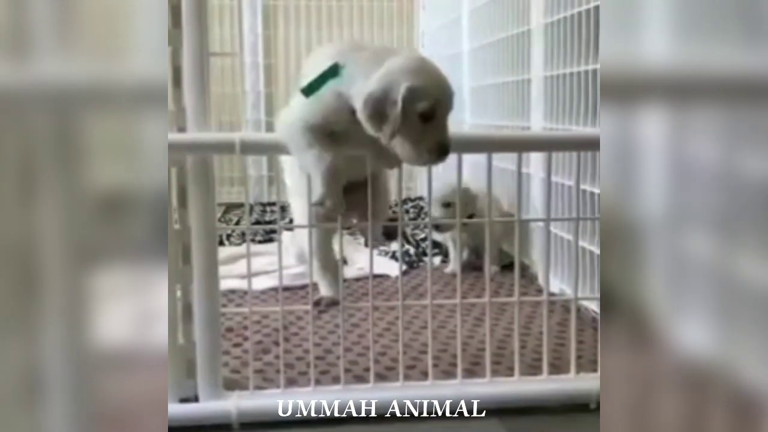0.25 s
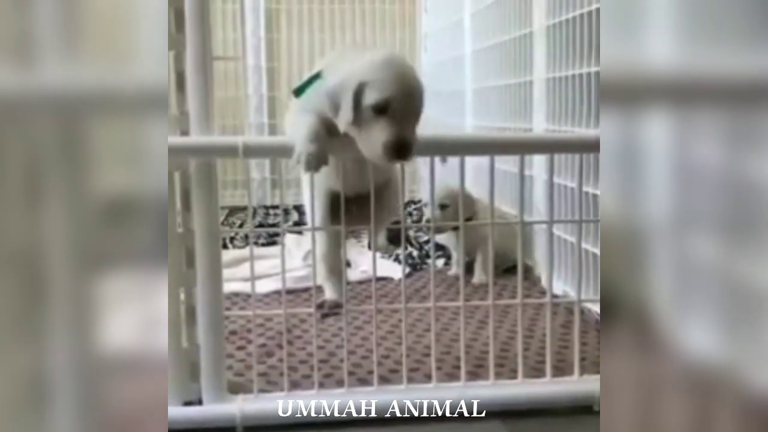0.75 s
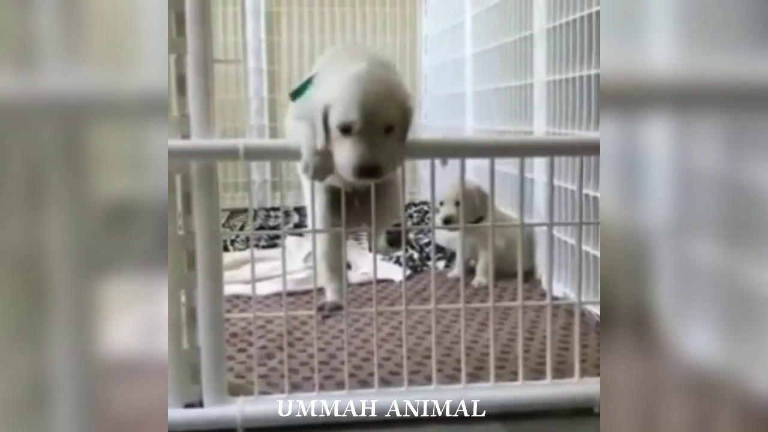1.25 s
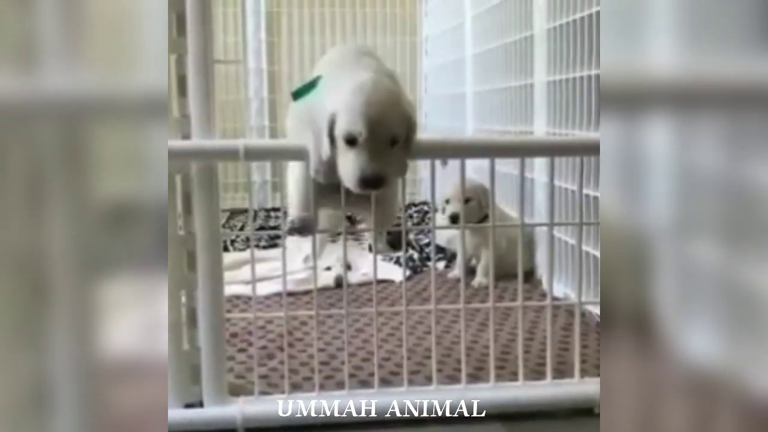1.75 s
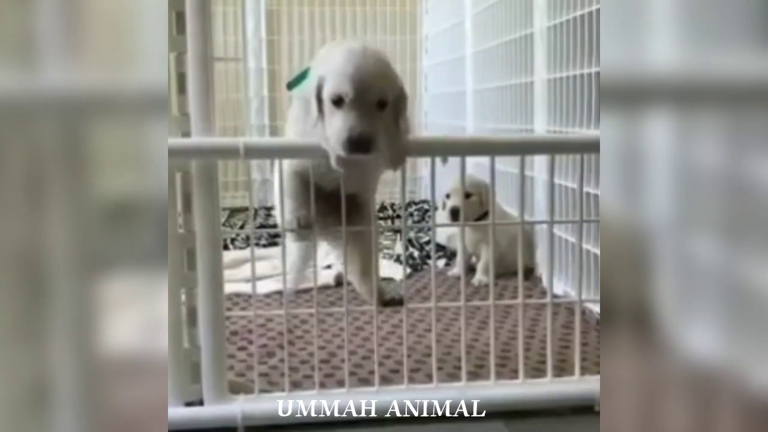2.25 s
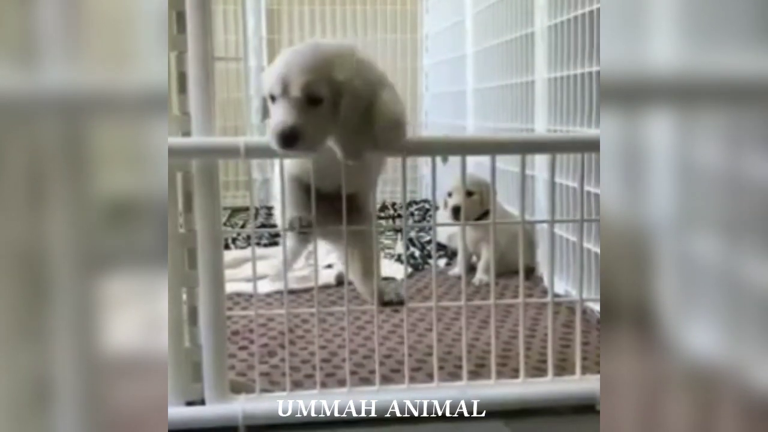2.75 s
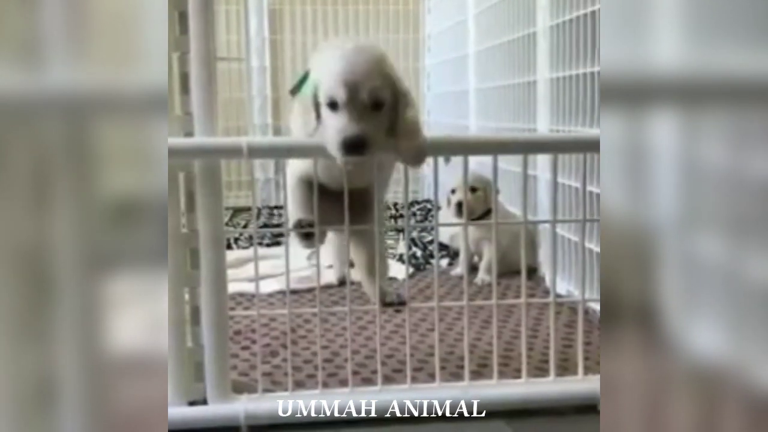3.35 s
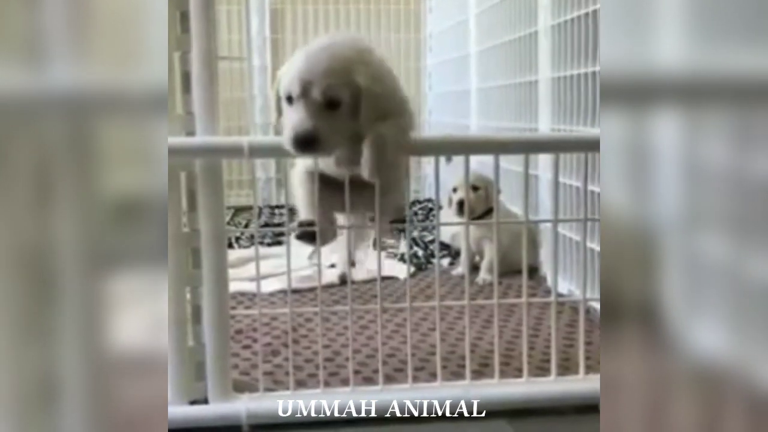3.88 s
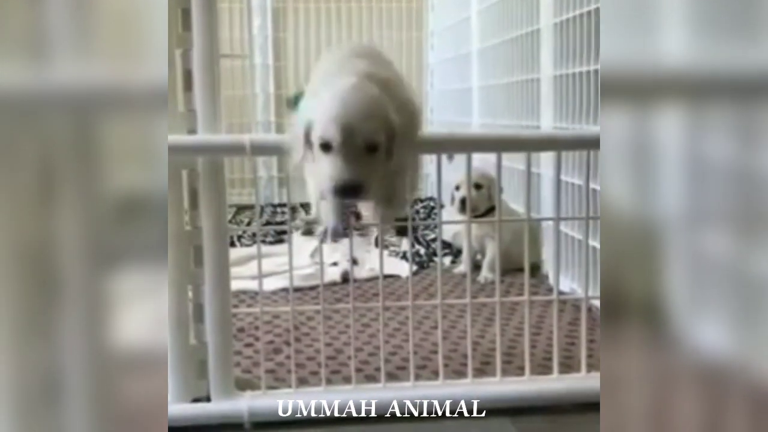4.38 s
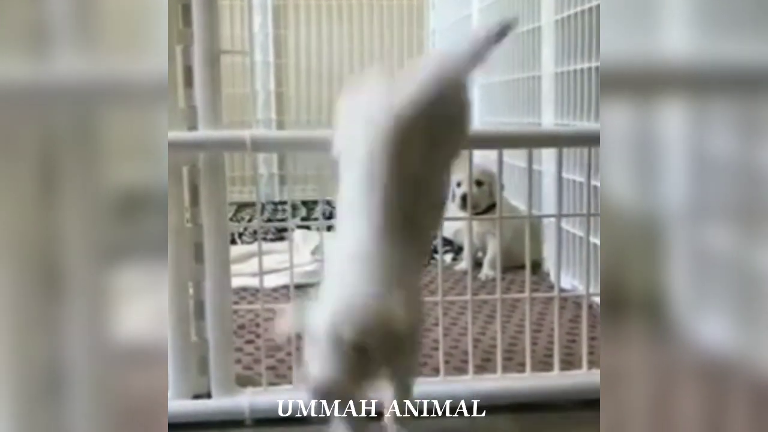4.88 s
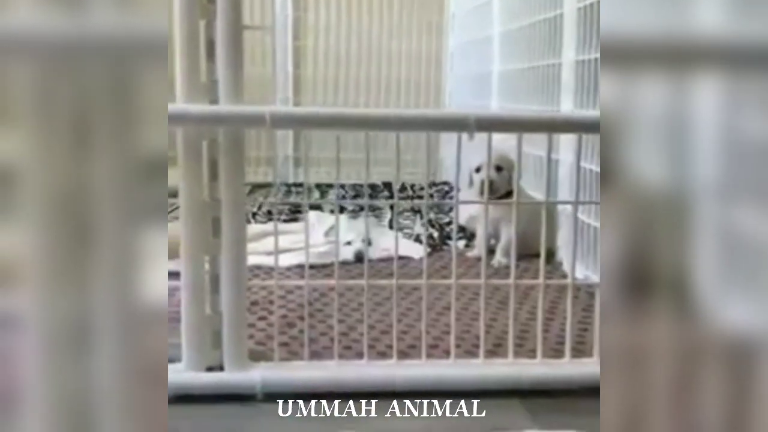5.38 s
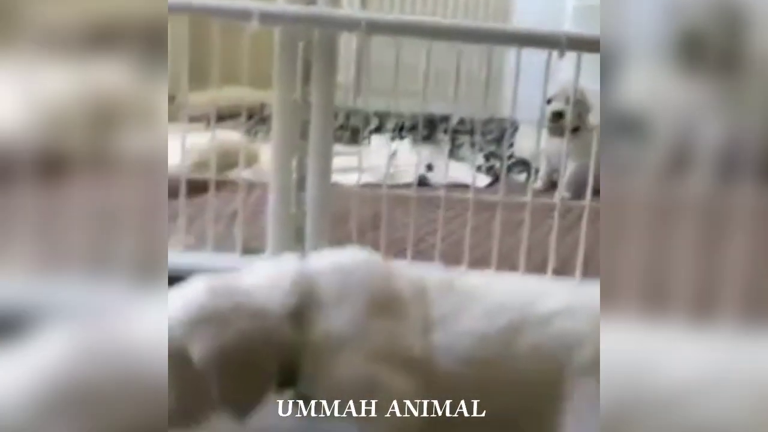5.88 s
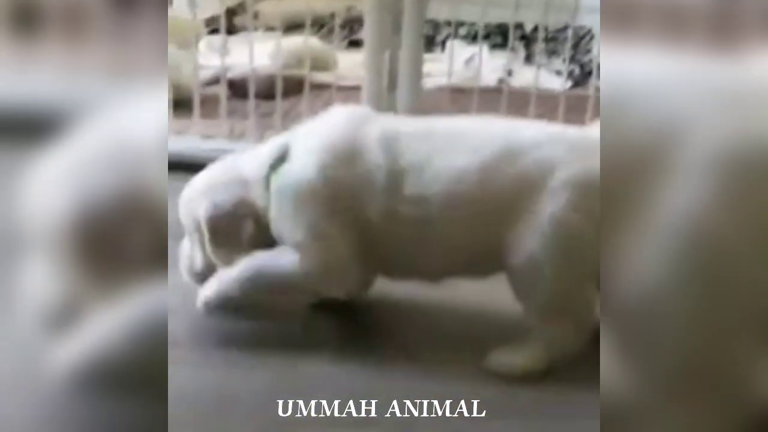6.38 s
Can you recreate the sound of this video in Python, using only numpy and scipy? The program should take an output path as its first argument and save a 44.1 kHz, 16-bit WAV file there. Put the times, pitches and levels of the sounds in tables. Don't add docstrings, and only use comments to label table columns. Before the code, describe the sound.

Faint hum and soft hiss lie under a young puppy's high squeaky whimpers, each a fraction of a second and falling at the end, heard a step from a phone-like microphone with dull treble limits. Light claw ticks on bars join in. Then paws hit the floor, nails skitter, a hollow panel is knocked hard, the pen rumbles away, and quiet nose puffs and sparse ticks finish the scene indoors.

```python
import sys
import numpy as np
from scipy import signal
from scipy.fft import rfft, irfft
from scipy.io import wavfile
from scipy.ndimage import uniform_filter1d

SR = 44100
rng = np.random.default_rng(int(sys.argv[2]) if len(sys.argv) > 2 else 0)


def inscribe(sig):
    pcm = np.round(np.clip(np.atleast_2d(sig).T, -1, 1) * 32767)
    wavfile.write(sys.argv[1], SR, pcm.astype(np.int16))


def ratio_of_db(decibels):
    return 10 ** (np.asarray(decibels, float) / 20)


N = 292383
T = np.arange(N) / SR

# (pitch [Hz], level [dB])
HUM = [(48.4, -60), (96.9, -88.5), (118.4, -70), (209.9, -77.5)]
# (frequency [Hz], level per Hz [dB])
HISS = [(12, -35), (20, -10), (130, -8), (172, -13.5), (974, -27.5), (1360, -24), (1790, -29.5),
        (3100, -36.5), (3660, -35.5), (4560, -39.5), (7910, -40.5), (11600, -39.5), (14500, -43)]

# (time [s], peak [dB], tilt [dB per octave], low knock [dB])
BAR_TICKS = [(0.0624, -73, -8.5, -57), (0.187, -54, -11, -57), (1.8951, -44.5, -1.5, -72),
             (1.936, -43, -2, -75), (2.0433, -48, -3, -75), (2.1027, -48, -9, -50.5),
             (2.2563, -32.5, -4, -56), (3.1312, -43, 1, -71), (3.2014, -35.5, 1.5, -71),
             (3.8484, -42.5, -0.5, -81), (3.924, -31.5, -0.5, -56), (4.045, -40, 0.5, -72),
             (4.1291, -63, -6, -55), (4.177, -43, -1.5, -64), (4.2294, -37, 0.5, -74),
             (4.2374, -34, -15, -47), (4.8132, -43, -4.5, -61), (4.8342, -42, -7.5, -55)]
# (time [s], peak [dB], tilt [dB per octave], low knock [dB])
FLOOR_TICKS = [(5.213, -29, -3.0, -54.5), (5.2212, -62.5, -9, -63), (5.236, -33, -3.0, -39),
               (5.318, -42, -2.5, -55.5), (5.3991, -33, -3.5, -68.5), (5.4095, -32.5, -4.5, -57),
               (5.4197, -37, -1, -66), (5.4815, -29.5, -0.5, -48), (5.5386, -26.5, -8.5, -64.5),
               (5.639, -42, 5, -65), (6.0887, -41, -2, -60), (6.392, -47.5, -4, -55), (6.5354, -46, 0, -64),
               (6.542, -41, -0.5, -71), (6.599, -42.5, -1, -55.5)]

# (time [s], length [s], level [dB])
PUFFS = [(0.092, 0.06, -72.5), (0.348, 0.071, -69.5), (0.687, 0.2, -70.5), (1.166, 0.058, -62),
         (1.534, 0.067, -66.5), (1.846, 0.048, -62), (2.468, 0.058, -62), (2.792, 0.037, -67),
         (3.768, 0.038, -61), (4.299, 0.095, -63.5), (4.65, 0.045, -69), (5.914, 0.07, -49),
         (5.976, 0.025, -49), (6.249, 0.076, -50), (6.599, .024, -54), (4.176, 0.048, -62),
         (1.903, 0.061, -63), (5.308, 0.023, -53), (5.549, 0.045, -43.5), (3.972, 0.062, -62),
         (0.924, 0.021, -78), (2.257, 0.052, -61.5), (3.21, 0.049, -68)]
# (time [s], length [s], first pitch [Hz], last pitch [Hz], level [dB])
WHISTLES = [(.115, 0.028, 13700, 13600, -61), (0.366, 0.047, 14000, 13300, -63),
            (0.792, 0.039, 13900, 13200, -55), (0.806, 0.066, 13300, 13200, -62.5),
            (1.14, 0.048, 12600, 11100, -51.5), (1.487, 0.03, 12300, 11800, -57),
            (1.504, 0.05, 12430, 11500, -50), (1.819, 0.04, 12200, 11730, -49),
            (2.095, .05, 13000, 13400, -71), (2.133, 0.086, 12750, 12400, -48.5),
            (2.435, 0.063, 12700, 11200, -52), (2.754, 0.071, 11930, 12400, -69.5),
            (3.046, 0.079, 12100, 11500, -58), (3.318, 0.074, 12850, 13100, -56),
            (3.352, 0.065, 12300, 12000, -58.5), (3.446, 0.037, 12000, 11700, -51),
            (3.706, 0.068, 13260, 11600, -46)]
# (time [s], first pitch [Hz], level [dB])
UP_CHIRPS = [
    (1.059, 13200, -64.5),
    (2.063, 13200, -62),
    (4.564, 13200, -64),
    (5.097, 13150, -53.5),
]
# (time [s], first pitch [Hz], level [dB])
DOWN_CHIRPS = [(1.208, 13450, -62), (1.558, 13050, -52.5), (1.855, 13250, -59), (2.515, 13100, -62),
               (2.799, 13050, -58.5), (3.105, 13100, -61), (3.785, 12900, -51.5), (4.019, 13450, -60),
               (4.375, 13300, -58), (4.642, 13000, -52.5)]
# (multiple of the voice pitch, level [dB])
SIDEBANDS = [(-2, -16), (-1, -1), (1, -16)]

# (start [s], crest [s], end [s], level at the crest [dB], mouth opening [0-1])
WHINES = [(0.716, 0.750, 0.806, -40.5, 0), (0.806, 0.82, 0.885, -52.5, .1),
          (1.086, 1.139, 1.187, -29, 0.46), (1.449, 1.482, 1.540, -28.5, 0.28),
          (1.768, 1.819, 1.845, -30, 0.15), (2.086, 2.136, 2.212, -25.5, 0.44),
          (2.385, 2.422, 2.478, -28.5, 0.33), (2.718, 2.769, 2.801, -28.5, 0.2),
          (2.994, 3.043, 3.105, -26.5, 0.45), (3.652, 3.703, 3.758, -24, 0.26), (3.992, 4, 4.028, -45, 0.5),
          (4.252, 4.298, 4.320, -31.5, 0), (5.108, 5.146, 5.202, -47, .75)]
# (first pitch [Hz], crest pitch [Hz], last pitch [Hz], bend of the climb [power],
# bend of the fall [power]); a bend under 1 is sharp at the crest, over 1 round
TUNES = [(1150, 1225, 1090, 0.72, .2), (1195, 1185, 1160, 0.98, 1.1), (1429, 1408, 1015, 1.28, .8),
         (1347, 1444, 1170, 1.5, 1.106), (1400, 1490, 1210, 1.6, 2), (1444, 1512, 950, 1.4, 1.45),
         (1087, 1387, 1045, 0.97, 1.1), (1363, 1395, 997, 2.1, 1.4), (1353, 1508, 1036, 1.2, 1.4),
         (1058, 1426, 1060, 1.7, 1.52), (1045, 1008, 863, 0.92, 0.62), (966, 1220, 985, 0.368, 0.31),
         (810, 861, 830, 1.9, .45)]
# (swell up to the crest [dB], slump after it [dB], breath against the voice [dB])
EFFORTS = [(13.5, 20, -24), (5, 10, -36), (3.5, 26.5, -30.5), (1.5, 16.5, -29.5), (0, 0, -29.5),
           (4, 18.5, -29.5), (6, 12, -28.5), (3, 17, -30), (3.5, 19, -27.5), (10, 18, -28.5), (3, 17, -27),
           (8, 12, -22.5), (3, 19, -17)]
# (time [s], pitch [Hz], level [dB])
SHAPED = [
    [(3.288, 1490, -48), (3.298, 1485, -27.5), (3.315, 1500, -28.5), (3.338, 1557, -27.5),
     (3.375, 1544, -28.5), (3.41, 1409, -27), (3.45, 1305, -29), (3.468, 1100, -36), (3.487, 963, -71)],
    [(4.57, 950, -58), (4.577, 950, -40), (4.59, 1016, -35.5), (4.606, 1150, -32.5), (4.622, 1257, -32.5),
     (4.628, 1268, -35), (4.633, 1135, -38), (4.641, 1130, -45), (4.648, 1100, -70)],
]
# (mouth opening [0-1], breath against the voice [dB])
SHAPED_MOUTH_BREATH = [
    (0.48, -32),
    (.15, -25),
]
# (lift of partial 2 [dB], of 3 [dB], of 4 [dB],
# of 5 and up [dB], loss of the upper ones as the pitch sags [dB])
COLOURS = [(3.5, 5, -1.5, 3, 0.5), (-1, -1.5, -3.5, 0, 1), (-0.5, 0.5, -4.5, 1.5, 6), (0.5, 2, -6, -4, 0),
           (-1.5, -1.5, 1.5, 4, 3), (3, 1.5, -7, -8.5, 6), (0, 1, -7, -1, 2.5), (-5, -4.5, 7, 3, 6),
           (-6, 0, 1.5, -2, 7), (1, -1, 1, 6, 5), (3, 1, -1, -4, 0), (-0.5, 0, -5, 2, 0),
           (3, 3, 7, 7.5, 10), (1, 4, -4, 3, 0), (-1, 7, 1, 8, 3)]
# (frequency [Hz], level [dB])
THROAT = [(900, 3), (1600, -2), (1900, -14), (2500, -31.5), (3100, -40.5), (3700, -32), (4400, -19.5),
          (5000, -28), (5800, -29), (6500, -28), (7400, -33), (8500, -39), (11000, -57), (13500, -53)]
# (frequency [Hz], level per Hz [dB])
BREATH = [(1500, -14), (2600, -8), (4500, -1.5), (6800, 2), (9000, -5.5), (12000, -1.5), (14500, -6)]

# (time [s], # peak [dB], ring pitch [Hz], time to fall 60 dB [s])
KNOCKS = [(5.5407, -6, 758, 0.014), (5.5402, -10, 962, 0.0094), (5.5402, -14, 1110, 0.0099),
          (5.5404, -30.5, 600, 0.0085), (5.5872, -15.5, 530, 0.011), (5.155, -44, 110, 0.035),
          (5.1095, -50, 1600, .02), (5.141, -49, 1660, .04), (5.16, -54, 2300, .015),
          (5.174, -53, 1900, .015), (5.222, -39, 620, 0.02), (5.237, -33, 1270, 0.013),
          (5.241, -36.5, 600, 0.0182), (5.243, -43, 330, 0.021), (5.545, -39.5, 150, 0.055),
          (5.589, -42, 197, 0.048), (2.105, -50.5, 172, 0.062), (2.262, -55.5, 320, 0.033),
          (4.2385, -29.5, 1300, 0.011)]
# (time [s], level [dB])
SCRAMBLE = [(4.8, -82), (4.818, -64), (4.845, -64), (4.875, -80), (5.05, -84), (5.095, -71), (5.16, -63),
            (5.288, -63.5), (5.455, -62), (5.556, -47.5), (5.685, -57.5), (5.734, -77.5), (6.072, -61),
            (6.2, -77.5)]
# (frequency [Hz], level per Hz [dB])
SCUFF = [(88, -40.5), (150, -11.5), (1260, -6), (1380, -8), (1640, -7), (2140, -8.5), (2740, -10.5),
         (14000, -16.5)]
# (frequency [Hz], level per Hz [dB])
WASH = [(250, -21), (450, -3), (700, -1), (1000, -1), (1300, -7), (1700, -24), (3000, -42)]

# (frequency [Hz], time to fall 60 dB [s], level [dB])
ROOM = [(200, 0.28, -18.5), (800, 0.36, -22), (1150, .5, -26.5), (1500, 0.55, -26), (3850, 0.33, -18.5),
        (7500, 0.26, -22.5)]
# (frequency [Hz], time to fall 60 dB [s], level [dB])
ROOM_TOP = (12000, .14, -28)
# (delay [s], level [dB])
ECHOES = [
    (0.015, -20.5),
    (.026, -22),
    (.068, -22.5),
    (.095, -25.5),
]
# (pitch [Hz], level at resonance [dB])
ROOM_MODES = [(590, -6), (1160, -12), (1205, -9), (1310, -13), (1368, -10), (1397, -12), (1465, -7),
              (1522, -10)]


def along(hz, table):
    f, v = np.transpose(table)
    return np.interp(np.log(np.maximum(hz, 1)), np.log(f), v)


def noise(spectrum, size=N):
    gain = ratio_of_db(along(np.fft.rfftfreq(size, 1 / SR), spectrum))
    x = irfft(rfft(rng.standard_normal(size)) * gain, size)
    return x / x.std()


def walk(rate):
    k = int(SR / rate)
    held = np.repeat(rng.standard_normal(N // k + 1), k)
    w = uniform_filter1d(uniform_filter1d(held, k), k)[:N]
    return w / w.std()


def add(out, s, x):
    i = int(s * SR)
    out[i:i + len(x)] += x[:N - i]


def ring(hz, t60, rise_s):
    t = np.arange(int(1.49 * t60 * SR) + 64) / SR
    return np.sin(2 * np.pi * hz * t) * np.exp(-np.log(1000) * t / t60) * (1 - np.exp(-t / rise_s))


def appliances():
    hum = np.zeros(N)
    for hz, db in HUM:
        level = np.sqrt(2) * ratio_of_db(db + 1.2 * walk(5.8))
        hum += level * np.sin(2 * np.pi * np.cumsum(hz * (1 + .015 * walk(3.2))) / SR)
    hiss = noise(HISS)
    treble = signal.sosfilt(signal.butter(2, 2500, "high", fs=SR, output="sos"), hiss)
    bass = hiss - treble
    flickering = bass * ratio_of_db(.8 * walk(5)) + treble * ratio_of_db(1.5 * walk(6) + 1.2 * walk(25))
    return hum + ratio_of_db(-65) * flickering


def claws():
    out, t = np.zeros(N), np.arange(2048) / SR
    ticks = [(*row, 2.36) for row in BAR_TICKS] + [(*row, 2.6) for row in FLOOR_TICKS]
    for s, db, tilt_db, knock_db, scrape_ms in ticks:
        colour = [(500, -7), (2000, -tilt_db), (4000, -1.5), (8000, tilt_db), (16000, 6.1 * tilt_db)]
        rise = 1 - np.exp(-t * 2000 / scrape_ms)
        scrape_and_rattle = np.exp(-t * 1000 / scrape_ms) + 0.38 * np.exp(-t / 0.011)
        add(out, s, ratio_of_db(db - 6) * noise(colour, size=len(t)) * rise * scrape_and_rattle)
        thud = noise([(120, -15), (300, -7.0), (900, 1.0), (2500, -26.5)], size=len(t))
        add(out, s, ratio_of_db(knock_db) * thud * np.exp(-t / 0.0068))
    return out


def patchy_air():
    spectrum, hz = rfft(noise(BREATH)), np.fft.rfftfreq(N, 1 / SR)
    edges = [0, 3300, 5200, 7600, 10500, SR]
    air = np.zeros(N)
    for low, high in zip(edges, edges[1:]):
        band = irfft(spectrum * ((hz >= low) & (hz < high)), N)
        air += band * ratio_of_db(2.5 * walk(28))
    return air


def nose(folds, air):
    out, waver = np.zeros(N), walk(300)
    air = np.roll(air, SR) * ratio_of_db(1.3 * walk(200))
    chop = 1
    for multiple, db in SIDEBANDS:
        chop = chop + ratio_of_db(db) * np.abs(folds) * np.exp(1j * multiple * np.angle(folds))
    chirp_s, up_hz, down_hz = .021, 530, 620
    chirps = [(s, chirp_s, hz, hz + up_hz, db) for s, hz, db in UP_CHIRPS]
    chirps += [(s, chirp_s, hz, hz - down_hz, db) for s, hz, db in DOWN_CHIRPS]
    for s, length, first_hz, last_hz, db in WHISTLES + chirps:
        hz = np.linspace(first_hz, last_hz, int(length * SR))
        on = slice(int(s * SR), int(s * SR) + len(hz))
        tone = np.exp(2j * np.pi * np.cumsum(hz * (1 + 0.003 * waver[on])) / SR) * chop[on]
        level = ratio_of_db(db + 2.8 * waver[::-1][on])
        out[on] += level * signal.windows.tukey(len(hz), .7) * tone.imag
    for s, length, db in PUFFS:
        size = int(1.25 * length * SR)
        add(out, s, ratio_of_db(db) * np.hanning(size) * air[int(s * SR):][:size])
    return out


def short_whine(start, crest, end, db, first_hz, crest_hz, last_hz, climb_bend, fall_bend, swell_db, slump_db):
    t = T[int(start * SR):int(end * SR)]
    to_climb = np.clip((crest - t) / (crest - start), 0, 1) ** climb_bend
    fallen = np.clip((t - crest) / (end - crest), 0, 1) ** fall_bend
    slack_hz, scoop_share, scoop_s = 947, .3, .005
    scoop = scoop_share * max(first_hz - slack_hz, 0) * np.exp(-(t - start) / scoop_s)
    attack_s, attack_db, release_s, release_db = 0.0084, -18.5, 0.021, -23.5
    edges = attack_db * np.clip(1 - (t - start) / attack_s, 0, 1)
    edges += release_db * np.clip(1 - (end - t) / release_s, 0, 1) ** 2
    hz = crest_hz - (crest_hz - first_hz) * to_climb - (crest_hz - last_hz) * fallen - scoop
    return hz, db - swell_db * to_climb - slump_db * fallen + edges


def calls():
    for (start, crest, end, db, mouth), tune, effort in zip(WHINES, TUNES, EFFORTS):
        swell_db, slump_db, breath_db = effort
        yield start, *short_whine(start, crest, end, db, *tune, swell_db, slump_db), mouth, breath_db
    for table, (mouth, breath_db) in zip(SHAPED, SHAPED_MOUTH_BREATH):
        s, hz, db = np.transpose(table)
        t = T[int(s[0] * SR):int(s[-1] * SR)]
        yield s[0], np.interp(t, s, hz), np.interp(t, s, db), mouth, breath_db


def whines(air):
    out, flow, folds = np.zeros(N), np.zeros(N), np.zeros(N, complex)
    air, waver = air * ratio_of_db(1.8 * walk(400)), walk(200)
    k = np.arange(1, 11)[:, None]
    upper = k > 1
    patchy = np.array([walk(45) for _ in k])
    grit = np.array([np.roll(waver, 5000 * j) for j in k[:, 0]])
    veil = .35
    for (s, hz, db, mouth, breath_db), (*lift_db, sag_db) in zip(calls(), COLOURS):
        on = slice(int(s * SR), int(s * SR) + len(hz))
        db = uniform_filter1d(db, 200, mode="nearest")
        hz = uniform_filter1d(hz, 300, mode="nearest")
        weak = np.clip((-35 - db.max()) / 12, 0, 1)
        db = db + 2.5 * weak * patchy[0, on]
        phase = 2 * np.pi * np.cumsum(hz * (1 + (.002 + .018 * weak) * waver[on])) / SR

        partial_db = along(k * hz, THROAT)
        partial_db += 3.5 * (mouth - .5) * (k - 1) * hz / 1000
        partial_db += 1.36 * np.minimum(k - 1, 3) * patchy[:, on]
        sag = (np.arange(len(hz)) > hz.argmax()) * (1 - hz / hz.max()) * 8
        partial_db += np.array([0, *lift_db])[np.minimum(k - 1, 4)]
        partial_db -= sag_db * sag * np.clip((k - 1) / 3, 0, 1)
        partial_db += 0.41 * upper * (db - db.max())
        partial_db += upper * (2 + .3 * np.minimum(db.max() - db, 12)) * grit[:, on]

        ragged = (grit[::-1, on] + 1j * grit[:, ::-1][:, on]) / np.sqrt(2)
        rise_s = .012
        rise = 1 - np.exp(-(np.arange(len(hz)) / SR / rise_s) ** 2)
        shape = np.where(upper, rise * (np.sqrt(1 - veil ** 2) + veil * ragged), 1)
        waves = (shape * np.exp(1j * k * phase)).imag
        voice = np.sqrt(2) * np.sum(ratio_of_db(partial_db) * waves, axis=0)
        out[on] += signal.windows.tukey(len(hz), .12) * ratio_of_db(db) * voice

        flow_db = 0.22 * (db - db.max()) + db.max() + breath_db
        flow[on] = ratio_of_db(flow_db - 6.5 * np.linspace(1, 0, len(hz)))
        folds[on] = np.clip(ratio_of_db(db + 40), 0, 1) * np.exp(1j * phase)
    lead_s, slur_s = 0.0061, 0.063
    slur = int(slur_s * SR / 2)
    flow = np.roll(uniform_filter1d(uniform_filter1d(flow, slur), slur), -int(lead_s * SR))
    return out + flow * air, folds


def knocks():
    out = np.zeros(N)
    for s, db, hz, t60 in KNOCKS:
        add(out, s, ratio_of_db(db + 6.5) * ring(hz, t60, rise_s=0.0011))
    return out


def scramble():
    s, db = np.transpose(SCRAMBLE)
    grain_db = 1.6 * (walk(68) + 1.7 * walk(900))
    return ratio_of_db(np.interp(T, s, db, -120, -120) + grain_db) * noise(SCUFF)


def wash():
    start_s, level_db, t60 = 5.548, -37.5, .72
    t, out = np.arange(SR) / SR, np.zeros(N)
    fade = ratio_of_db(level_db - 60 * t / t60 + 2.2 * walk(60)[:SR])
    add(out, start_s, fade * (1 - np.exp(-t / .008)) * noise(WASH, size=SR))
    return out


def room(x):
    t, tail = np.arange(SR) / SR, np.zeros(SR)
    table = np.array(ROOM + [ROOM_TOP])
    hz_t60, hz_db = table[:, :2], table[:, ::2]
    for hz in 60 * 2 ** np.arange(0, 8, .5):
        colour = [(hz / 1.6, -60), (hz / 1.19, -3), (hz, 0), (hz * 1.19, -3), (hz * 1.6, -60)]
        band = noise(colour, size=SR)
        t60 = along(hz, hz_t60)
        decay = ratio_of_db(-60 * t / t60) + ratio_of_db(-7 - 60 * t / t60 / 2.1)
        tail += ratio_of_db(along(hz, hz_db)) * np.sqrt(hz / SR) * band * decay / np.sqrt(np.sum(decay ** 2))
    for s, db in ECHOES:
        add(tail, s, ratio_of_db(db - 9) * np.hanning(10) / 4.5)
    mode_t60 = .95
    for hz, db in ROOM_MODES:
        level = ratio_of_db(db - 10) * 2 * np.log(1000) / (mode_t60 * SR)
        add(tail, 0, level * ring(hz, mode_t60, rise_s=.02)[:SR])
    gap = np.clip(t / 0.0055, 0, 1) ** 2
    return x + signal.fftconvolve(x, tail * gap * ratio_of_db(10))[:N]


def thin_faint_bands(x, top_hz):
    hz, _, z = signal.stft(x, SR, nperseg=1024, noverlap=768)
    frames = z.shape[-1]
    power = uniform_filter1d(np.abs(z) ** 2, size=7, axis=-1)
    band = power[:, :-1].reshape(1, -1, 4, frames).mean(axis=2).repeat(4, axis=1)
    hz = hz[:-1, None]

    low_hz, high_hz = 1650, 5200
    shadow = ratio_of_db(-54.5 - 1.5 * np.log2(np.maximum(hz, 1) / low_hz)) ** 2
    shadow = shadow * ratio_of_db(5 * rng.standard_normal((128, 1)).repeat(4, axis=0))
    inside = (hz > low_hz) & (hz < high_hz)
    loudest = np.roll(power[:, 16:].max(axis=1, keepdims=True), 5, axis=-1)
    z[:, :-1] *= ~(inside & (band < shadow * loudest))

    sag = np.clip(walk(14)[np.minimum(np.arange(frames) * 256, N - 1)], 0, 3)
    edge_hz = top_hz + 150 - 450 * sag
    gaps = uniform_filter1d(rng.standard_normal((64, frames)), size=7, axis=-1)
    gaps = gaps.repeat(8, axis=0) * np.sqrt(7)
    z[:, :-1] *= (hz < edge_hz) & ~((gaps > 2.1) & (hz > 2800))
    return signal.istft(z, SR, nperseg=1024, noverlap=768)[1][:, :N]


def scene():
    air = patchy_air()
    voice, folds = whines(air)
    puppy = voice + nose(folds, air) + claws() + scramble() + knocks()
    return (room(puppy) + appliances() + wash())[None]


def roll_off(x):
    return signal.sosfilt(signal.butter(12, 15280, fs=SR, output="sos"), x)


def record(dry):
    bottom_hz, top_hz = 40, 13900
    x = signal.sosfilt(signal.butter(4, bottom_hz, "high", fs=SR, output="sos"), dry)
    x = signal.sosfilt(signal.ellip(8, .2, 60, top_hz, fs=SR, output="sos"), x)
    return roll_off(thin_faint_bands(x, top_hz))


dry = scene()
out = record(dry)
inscribe(out)
```